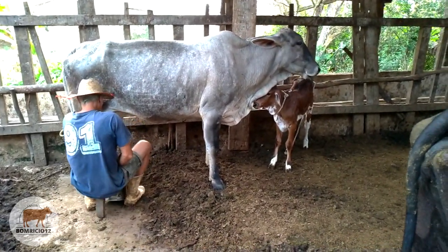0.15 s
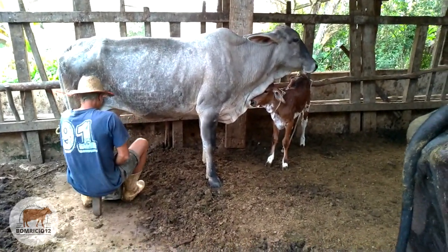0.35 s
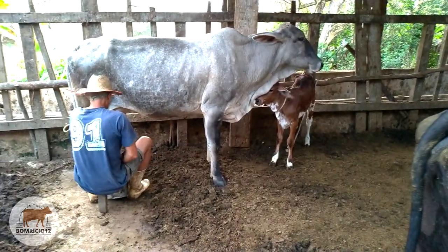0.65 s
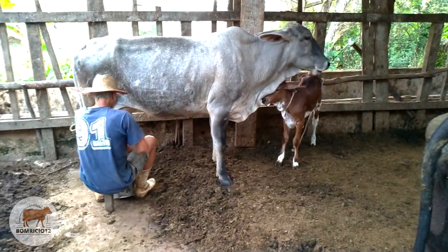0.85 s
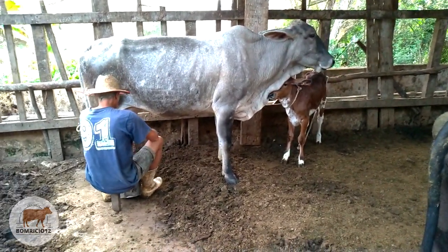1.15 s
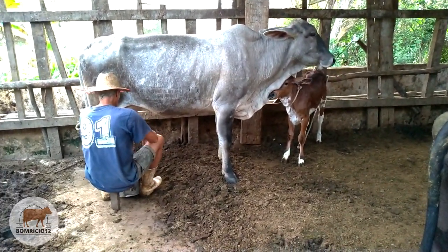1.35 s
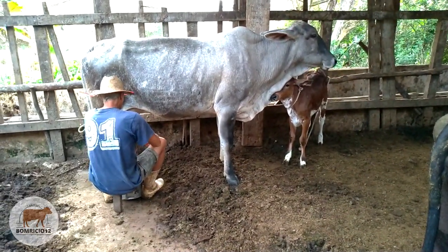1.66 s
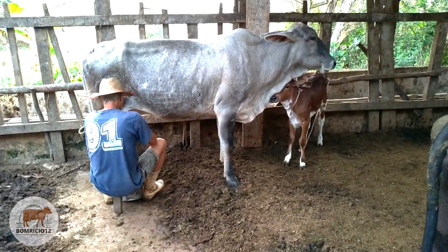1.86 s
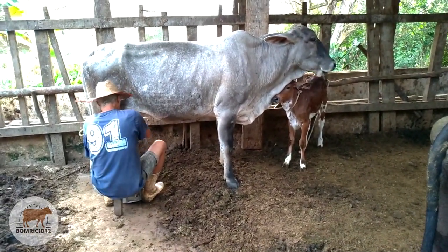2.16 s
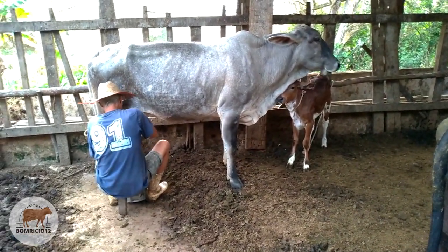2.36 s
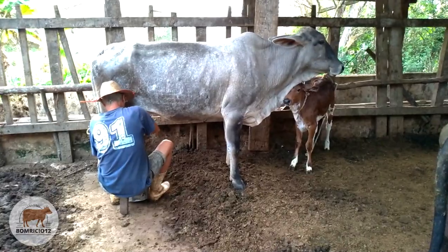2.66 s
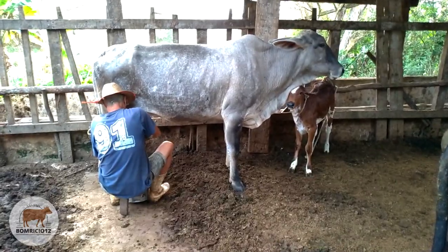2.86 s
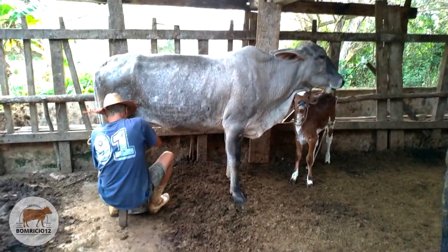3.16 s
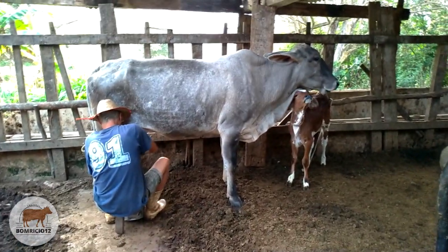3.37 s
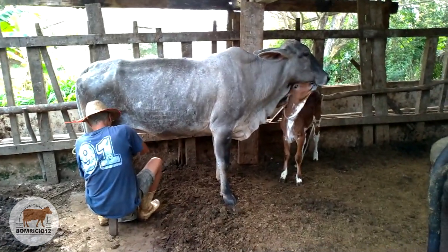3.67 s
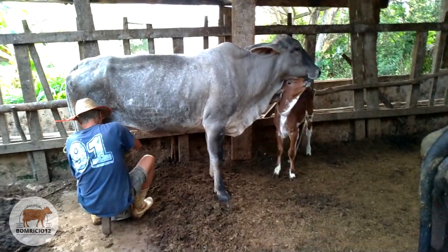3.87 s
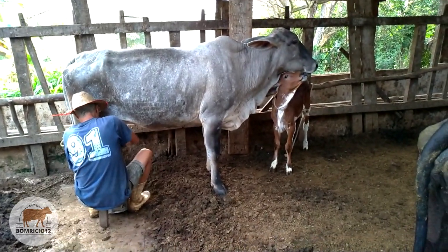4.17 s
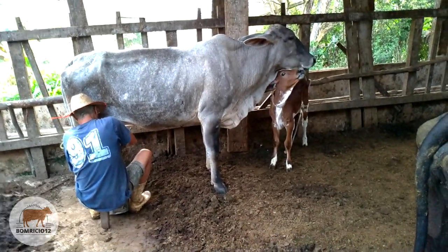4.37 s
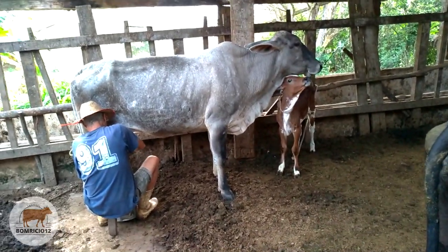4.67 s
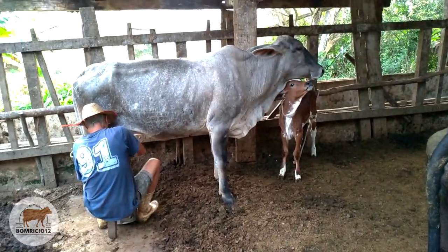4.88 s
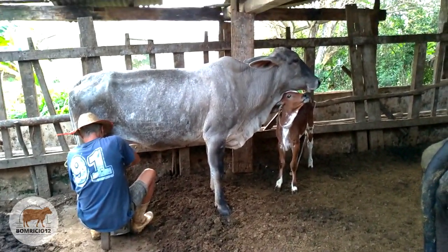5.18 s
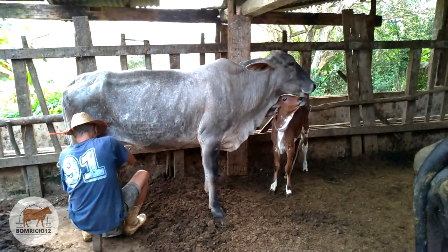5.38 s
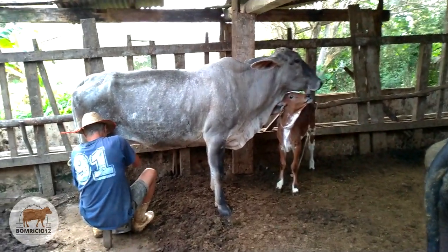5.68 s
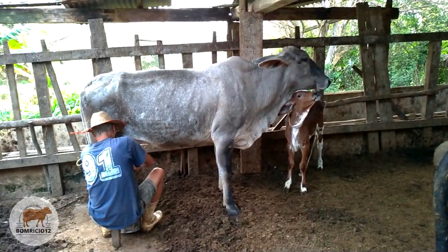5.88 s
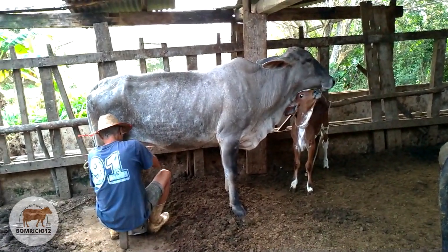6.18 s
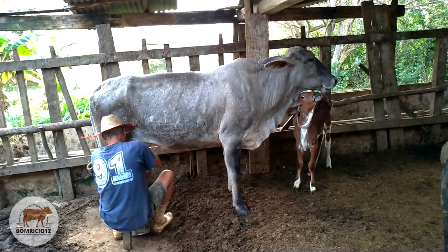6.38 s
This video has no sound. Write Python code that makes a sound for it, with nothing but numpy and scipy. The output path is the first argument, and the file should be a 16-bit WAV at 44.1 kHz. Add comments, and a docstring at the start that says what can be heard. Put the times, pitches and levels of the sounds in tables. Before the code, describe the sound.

Close by, a cow is milked by hand into a pail. After a few quick bumps and spurts, steady jets come about every 0.4 seconds, each hissing on froth, drumming the pail softly, then plunging with a wet bubbly slap. Chicks peep throughout and a hen clucks once late on. Faint insects and leaves lie behind, in an open shed heard in stereo.

```python
"""Under an open shed, a cow is milked by hand into a pail. Each jet of milk sprays on the froth and drums
the pail (droplet clicks, ringing walls), then plunges through with a wet slap and churns up bubbles.
Chicks peep near and far (gliding whistles), a small bird whistles thinly far off, and a hen clucks once.
Insects sizzle (a narrow band of noise), and far leaves and air hush behind it all (coloured noise)."""
import sys
import numpy as np
from scipy import signal
from scipy.io import wavfile

SR = 44100
rng = np.random.default_rng(int(sys.argv[2]) if len(sys.argv) > 2 else 0)


def transcribe(signal):
    """Save signal, clipped to [-1, 1], as a 16-bit WAV file at the path in sys.argv[1]."""
    frames = np.atleast_2d(signal).T
    limited = np.clip(frames, -1, 1)
    pcm = np.round(limited * 32767).astype(np.int16)
    wavfile.write(sys.argv[1], SR, pcm)


N = 287973   # length of the scene [samples]

# the jet breaking through the froth: (time [s], level [dB], loudest bubble pitch [Hz], time to fall 60 dB [s])
PLUNGE_ROWS = [(-.006, -39.5, 890, 0.017), (0.078, -49.5, 1370, 0.075), (0.327, -50, 1440, 0.16),
               (0.426, -36, 1250, 0.15), (.806, -54, 1360, 0.16), (0.852, -43.5, 870, 0.36),
               (1.312, -50, 1000, 0.37), (1.361, -45.5, 956, 0.19), (1.777, -37.5, 1640, 0.18),
               (1.817, -44, 990, 0.29), (2.36, -54, 910, 1), (2.431, -38.5, 1030, 0.27),
               (2.692, -61, 1050, 0.048), (2.83, -45.5, 940, 0.36), (2.888, -32, 1050, 0.061),
               (3.243, -49.5, 895, 0.85), (3.265, -38, 1280, 0.13), (3.294, -43.5, 840, 0.29),
               (3.655, -49.5, 825, 0.2), (3.678, -35.5, 933, 0.24), (4.029, -50, 840, 0.8),
               (4.077, -33.5, 1090, 0.17), (4.443, -56, 1210, .2), (4.472, -32.5, 943, 0.2),
               (4.835, -45, 880, 0.36), (4.87, -40.5, 1140, 0.14), (5.227, -25, 805, 0.011),
               (5.616, -53, 890, 0.48), (5.646, -42.5, 1010, 0.43), (5.677, -40.5, 1310, 0.26),
               (6.2, -55, 1000, 0.96), (6.255, -49, 1220, 0.38), (6.3, -43.5, 950, 0.16)]
# ringing modes of the pail's wall: (pitch [Hz], width [Hz], level [dB])
PAIL_MODES = [(153.4, 44, -9), (203, 61.5, 0.5), (274, 60, -1.5), (331.1, 27.6, 1.5), (422, 37, -4.5),
              (502, 94, -5.5)]


def from_db(db):
    """Turn decibels into gain."""
    return 10 ** (np.asarray(db) / 20)


def rms_one(x):
    """Scale a sound to an rms level of 1."""
    return x / np.sqrt(np.mean(x ** 2) + 1e-20)


def in_time(rows):
    """Draw straight lines between the rows of a curve: each column becomes one value per sample."""
    times, *columns = np.transpose(rows)
    return [np.interp(np.arange(N) / SR, times, column) for column in columns]


def at_hz(points, hz):
    """Read a spectrum at any pitch, on a log-frequency axis."""
    points = np.array(points)
    return np.interp(np.log(hz), np.log(points[:, 0]), points[:, 1])


def drift(rate_hz):
    """Random wandering with spread 1: noise smoothed twice at the given rate, made at every 40th sample."""
    r = np.exp(-80 * np.pi * rate_hz / SR)
    noise = rng.standard_normal(N // 40 + 2002)
    slow = signal.lfilter([1], [1, -2 * r, r * r], noise)[2000:]   # the smoother's start is dropped
    return np.interp(np.arange(N) / 40, np.arange(len(slow)), rms_one(slow))


def resonate(x, hz, width_hz):
    """Ring at one pitch, with gain 1 at the peak."""
    r = np.exp(-np.pi * width_hz / SR)
    feed = np.array([1, 0, -1]) * (1 - r * r) / 2
    return signal.lfilter(feed, [1, -2 * r * np.cos(2 * np.pi * hz / SR), r * r], x + 1e-18)


def grains(per_s, spread_db):
    """Make random clicks of uneven size and sign, with rms 1."""
    sizes = from_db(spread_db * np.minimum(rng.exponential(1, N), 5)) * rng.choice([-1, 1], N)
    return rms_one(sizes * (rng.random(N) < per_s / SR))


def colour(sources, spectrum, patchy_db, likeness):
    """Colour two pairs of sources in third-octave bands, each with its level, flicker and left-right likeness."""
    out, edges_hz = 0, 25 * 2 ** np.arange(0, 9.5, 1 / 3)
    for k, (low, high) in enumerate(zip(edges_hz, edges_hz[1:])):
        band = signal.butter(2, [low, high], "band", fs=SR, output="sos")
        mid, side = signal.sosfilt(band, sources[k % 2])   # neighbouring bands use different pairs
        hz = np.sqrt(low * high)
        alike = np.clip(at_hz(likeness, hz), 0, 1)
        gain = from_db(at_hz(spectrum, hz) + patchy_db * drift(7.6))
        # the side part has opposite signs left and right, so it makes the channels differ
        out = out + gain * (np.sqrt(1 + alike) * mid + np.sqrt(1 - alike) * side * [[1], [-1]])
    return rms_one(out)


def bursts(at_s, peak_db, rise_s, t60, size=1):
    """Power of one burst, one value per size samples: a quick rise, then a fall of 60 dB in t60 seconds."""
    t = np.arange(0, N, size) / SR - at_s
    rise_s, t60 = max(rise_s, .001), max(t60, .01)
    rise = np.clip(t / rise_s, 0, 1) ** 2
    fall = from_db(-120 * np.clip(t - rise_s, 0, None) / t60)
    return from_db(2 * peak_db) * rise * fall


def leaves_and_air():
    """Far leaves and air blend into a flickering hush: noise coloured band by band."""
    # hush: (pitch [Hz], level per Hz [dB])
    hush_colour = [(25, -39), (59, 4), (119, -8), (322, -5), (552, -10.5), (1420, -16), (2180, -15.5),
                   (3930, -22.5), (5400, -14.5), (7710, -35), (9560, -22.5), (13600, -39), (15500, -12)]
    # how alike left and right are: (pitch [Hz], likeness [0 to 1])
    hush_likeness = [(30, 0.28), (150, 0.89), (500, 0.42), (2000, 0.033), (15000, 0.029)]
    noise = rng.standard_normal((2, 2, N))
    return from_db(-60.5) * colour(noise, hush_colour, 4.36, hush_likeness)


def insects():
    """Many insects blur into a sizzle: noise in one steep band, its own in each channel, wavering in level."""
    band = signal.butter(6, (3920, 5050), "band", fs=SR, output="sos")
    sizzle = signal.sosfilt(band, rng.standard_normal((2, N)))
    return from_db(-64 + 2.7 * drift(4.4)) * rms_one(sizzle)


def shed(x):
    """Close echoes of rails and ground, then the roof's longer tail: decaying noise, its own in each channel."""
    tail_t60_s, close_t60_s = 0.4, .16
    t = np.arange(round(tail_t60_s * SR)) / SR
    decay = from_db(-60 * t / tail_t60_s) + from_db(5 - 60 * t / close_t60_s)
    tail = rng.standard_normal((2, len(t))) * decay * (t > .003)
    soft = signal.butter(2, 3600, fs=SR, output="sos")   # earth and straw swallow treble
    tail = signal.sosfilt(soft, tail)
    tail /= np.sqrt(np.sum(tail ** 2, axis=1, keepdims=True))
    return signal.fftconvolve(np.broadcast_to(x, (2, N)), tail, axes=1)[:, :N]


def flock():
    """Chicks further off peep at random: 45 rows with the same columns as the nearer peeps."""
    # (lowest, highest) of time, hold and fall [s], top and bottom pitch [Hz], level [dB]
    ranges = [(0, N / SR - .01), (.008, .045), (.02, .06), (3660, 4730), (2415, 3230), (-77, -58.5)]
    low, high = np.transpose(ranges)
    return list(low + (high - low) * rng.random((45, 6)))


def chicks(sag, waver, rasp):
    """A peep holds a whistle that sags a little, then drops; a small bird far off whistles the same way."""
    # chicks: (time [s], hold [s], fall [s], top pitch [Hz], bottom pitch [Hz], level [dB])
    peep_rows = [ (.0, 0.019, 0.03, 3880, 2530, -56), (0.132, 0.024, 0.0064, 4570, 4400, -56),
                 (0.174, 0.0096, 0.026, 4170, 2300, -49), (0.29, 0.016, 0.033, 3810, 2640, -51.5),
                 (0.446, 0.012, 0.026, 3970, 2460, -49.5), (0.573, 0.012, 0.029, 3910, 2570, -59),
                 (0.683, 0.035, 0.035, 3800, 2540, -64), (0.863, 0.029, 0.012, 4560, 4360, -54.5),
                 (0.88, 0.0086, 0.13, 4170, 3000, -55.5), (1.002, 0.0091, 0.039, 3860, 2410, -51.5),
                 (1.02, 0.022, 0.042, 4130, 3400, -51), (1.117, 0.017, 0.038, 3750, 2390, -54),
                 (1.161, 0.043, 0.04, 4600, 3660, -53), (1.291, 0.008, 0.037, 3460, 2290, -54),
                 (1.321, 0.011, 0.045, 3294, 2500, -56.5), (1.326, 0.047, 0.011, 4460, 4170, -53),
                 (1.492, 0.014, 0.037, 3870, 2780, -57), (1.542, 0.0087, 0.043, 2840, 2670, -60.5),
                 (1.566, 0.036, 0.037, 4010, 3100, -57.5), (1.663, 0.013, 0.026, 3700, 2660, -56),
                 (1.708, 0.012, 0.033, 3630, 2550, -71.5), (1.828, 0.018, 0.042, 4600, 3970, -52),
                 (1.875, 0.017, 0.03, 3890, 3450, -53), (1.889, 0.0053, 0.019, 3290, 2210, -48.5),
                 (2.018, 0.012, 0.024, 3860, 2310, -46.5), (2.021, 0.063, 0.022, 4470, 4220, -54),
                 (2.087, 0.0043, 0.016, 3440, 2490, -54), (2.208, 0.054, 0.04, 4410, 3850, -55),
                 (2.266, 0.0051, 0.021, 3750, 2390, -53), (2.337, 0.016, 0.03, 4050, 2940, -55.5),
                 (2.443, 0.026, 0.043, 4240, 2540, -55), (2.592, 0.0084, 0.049, 4120, 2720, -52),
                 (2.605, 0.046, 0.0099, 4370, 4200, -61.5), (2.626, 0.0041, 0.028, 3300, 2485, -53.5),
                 (2.753, 0.012, 0.027, 4060, 2710, -50.5), (2.819, 0.04, 0.015, 4425, 4000, -55),
                 (2.861, 0.0057, 0.022, 2980, 2490, -56), (2.938, 0.011, 0.027, 3890, 2390, -53.5),
                 (2.994, 0.04, 0.05, 4370, 3380, -53), (3.146, 0.029, 0.07, 4500, 3640, -55.5),
                 (3.35, 0.039, 0.023, 4410, 2490, -55), (3.43, 0.042, 0.015, 3880, 2940, -60),
                 (3.597, 0.032, 0.024, 3880, 2430, -54.5), (3.654, 0.025, 0.022, 3910, 2480, -52),
                 (3.752, 0.024, 0.0095, 4170, 4100, -52), (3.779, .006, 0.059, 3410, 2370, -58),
                 (3.788, 0.039, .01, 3850, 3750, -53), (3.841, 0.033, 0.026, 4510, 4220, -51.5),
                 (3.859, 0.0094, 0.013, 3200, 2770, -51.5), (3.906, 0.092, 0.025, 3830, 3700, -56),
                 (3.984, 0.0141, 0.11, 4550, 3820, -54), (4.168, 0.026, 0.022, 4580, 2450, -51.5),
                 (4.244, 0.045, 0.032, 4194, 2280, -56.5), (4.369, 0.028, 0.028, 3834, 2470, -53),
                 (4.507, 0.03, 0.025, 3940, 3310, -58), (4.705, 0.057, 0.11, 4690, 3255, -54.5),
                 (4.916, 0.013, 0.062, 4620, 4130, -51), (4.989, 0.0068, 0.025, 3400, 2370, -54),
                 (5.001, 0.054, 0.018, 4550, 4550, -53.5), (5.0, 0.1, 0.031, 4030, 3530, -49.5),
                 (5.048, 0.0059, 0.027, 3750, 2590, -52.5), (5.101, 0.014, 0.048, 3800, 2510, -55),
                 (5.133, 0.031, 0.037, 3980, 2660, -50), (5.248, 0.043, 0.042, 4590, 3800, -53),
                 (5.301, .015, 0.043, 3570, 2530, -56), (5.448, 0.039, 0.043, 4640, 4056, -52),
                 (5.461, 0.039, 0.042, 4020, 2510, -53.5), (5.684, .008, 0.039, 3310, 2620, -51),
                 (5.734, .02, 0.018, 2890, 2600, -68), (5.704, 0.068, 0.028, 3950, 3850, -57.5),
                 (5.867, 0.011, 0.028, 3530, 2320, -55), (5.933, 0.05, 0.03, 4080, 2660, -53.5),
                 (5.935, 0.055, 0.066, 4720, 3900, -53), (6.079, 0.0069, 0.033, 3475, 2690, -56.5),
                 (6.123, 0.027, 0.03, 3950, 2510, -53), (6.231, 0.045, 0.077, 4520, 2925, -54)]
    # small bird: (time [s], hold [s], glide [s], first pitch [Hz], last pitch [Hz], level [dB])
    bird_rows = [(1.089, 0.05, 0.095, 9950, 10900, -75), (1.47, .04, 0.071, 9300, 7000, -75)]
    # throat: (pitch [Hz], level [dB])
    throat = [(2300, -5), (2900, 1), (3400, -2.5), (4700, 0)]
    attack_s, release_s, overtone_db = 0.0085, 0.0022, -18
    wall_echo_s, wall_echo_db, left_lead = .046, -13.5, 3   # the lead is in samples
    out, shake, hoarse = np.zeros(N), drift(48.7), 1 + rasp * drift(310)
    for s, hold, fall, top_hz, bottom_hz, db in peep_rows + bird_rows + flock():
        hold, fall, at = max(hold, .003), max(fall, .006), round(max(s, 0) * SR)
        t = np.arange(min(round((hold + fall) * SR), N - at)) / SR
        hz = np.interp(t, [0, hold, hold + fall], [top_hz, top_hz * sag, bottom_hz])
        phase = 2 * np.pi * np.cumsum(hz * (1 + waver * shake[at:at + len(t)])) / SR
        edges = np.clip(np.minimum(t / attack_s, (hold + fall - t) / release_s), 0, 1)
        whistle = np.sin(phase) + from_db(overtone_db) * np.sin(2 * phase)
        out[at:at + len(t)] += np.sqrt(2) * from_db(db + at_hz(throat, hz)) * edges * whistle
    out *= hoarse
    delay = round(wall_echo_s * SR)
    out[delay:] += from_db(wall_echo_db) * out[:-delay]   # one distinct echo from a far wall
    return np.array([out, np.roll(out, left_lead)])


def hen(rough):
    """A short cluck breaks to a lower pitch: seven harmonics, shaped by the throat, with a shaky pitch."""
    # cluck: (time [s], pitch [Hz], level [dB])
    cluck_rows = [(5.194, 616.3, -49), (5.208, 639, -40.5), (5.218, 669, -36), (5.224, 437.7, -38),
                  (5.25, 440, -44), (5.275, 387.3, -46), (5.32, 402.5, -52.5)]
    # throat: (pitch [Hz], level [dB])
    throat = [(400, -2.5), (650, 6), (900, 11), (1350, 3.5), (1800, -20), (2250, -9.5), (3000, -17)]
    hz, db = in_time(cluck_rows)
    t = np.arange(N) / SR
    phase = 2 * np.pi * np.cumsum(hz * (1 + rough * drift(83.7))) / SR
    voice = sum(from_db(at_hz(throat, k * hz)) * np.sin(k * phase) for k in range(1, 8))
    sounding = (t > cluck_rows[0][0]) & (t < cluck_rows[-1][0])
    return voice * from_db(db) * sounding


def bumps(narrow_db, damped_t60):
    """A soft bump rings wall modes near its favoured pitch until a leg or hand damps them; a brief tap opens it."""
    # bumps against the pail: (time [s], level [dB], favoured pitch [Hz], rings free for [s])
    bump_rows = [(.0, -28.5, 243, 0.037), (.14, -19.5, 208, 0.025), (0.179, -28, 300, 0.015),
                 (0.238, -41, 239, 0.043), (3.49, -38, 324, 0.025), (4.575, -37.5, 330, 0.056)]
    out, t = np.zeros(N), np.arange(SR // 4) / SR
    for s, peak_db, favoured_hz, free_s in bump_rows:
        at = round(s * SR)
        gains = [from_db(db - narrow_db * abs(np.log2(hz / favoured_hz))) for hz, width_hz, db in PAIL_MODES]
        rings = sum(g * np.sin(2 * np.pi * mode[0] * t) for g, mode in zip(gains, PAIL_MODES)) / sum(gains)
        tap = from_db(-14 - 60 * t / .03) * np.sin(2 * np.pi * 640 * t)
        damping = from_db(peak_db - 60 * np.clip(t - free_s, 0, None) / damped_t60)
        out[at:at + len(t)] += damping * np.clip(t / 0.0017, 0, 1) * (rings + tap)
    return out


def jets():
    """Each jet lands, changes while the hand squeezes, then fades: power of its drumming and of its spray."""
    # jets of milk: (landing time [s], onset lasts [s], squeeze lasts [s], drumming level at squeeze end [dB],
    # drumming swell up to there [dB], drumming fade [dB per s], spray level at landing [dB])
    jet_rows = [(0.0, 0.0034, 0.0098, -40.5, -11, 54, -36.5), (0.202, 0.0062, 0.0045, -43.5, -2, 189, -51),
                (0.327, .005, 0.14, -41.5, 12.5, 115, -51.5), (0.731, .008, 0.039, -47.5, 14, 252, -57),
                (0.781, .012, 0.16, -44.5, 10.5, 67, -53.5), (1.248, 0.031, 0.15, -39, 14, 104, -48.5),
                (1.718, 0.0059, 0.086, -43, 18, 64, -55.5), (2.325, 0.02, 0.14, -36.5, 16, 102, -56.5),
                (2.787, 0.0046, 0.13, -39.5, 12.5, 91, -50), (3.209, 0.006, 0.18, -43.5, 5.5, 109, -52),
                (3.624, 0.0046, 0.072, -41, 11, 60, -50.5), (4.014, 0.0082, 0.13, -39, 8.5, 125, -47.5),
                (4.404, 0.02, 0.2, -46.5, 1, 189, -48.5), (4.807, 0.014, 0.082, -42, 12.5, 67, -50.5),
                (5.169, 0.015, 0.18, -42.5, 12.5, 97, -54), (5.585, 0.031, 0.16, -44, 4.5, 133, -46.5),
                (5.988, 0.014, 0.38, -44, 18.5, 87, -59.5)]
    # a jet that lands hard has spent its spray early; shares are of the drumming's swell and fade
    swell_share, sag_db, fade_share = 0.79, 8, 0.9
    drumming, spraying = 1e-12, 1e-12
    for s, onset_s, squeeze_s, drum_db, swell_db, fade_db, spray_db in jet_rows:
        t = np.arange(N) / SR - s
        landed = np.clip(t / max(onset_s, .002), 0, 1) ** 2
        squeezed = np.clip(t / max(squeeze_s, .003), 0, 1)
        since = np.clip(t - squeeze_s, 0, None)
        drum_now_db = drum_db - swell_db * (1 - squeezed) - fade_db * since
        drumming = drumming + landed * from_db(2 * drum_now_db)
        spray_gain_db = (swell_share * swell_db - sag_db) * squeezed - fade_share * fade_db * since
        spraying = spraying + landed * from_db(2 * (spray_db + spray_gain_db))
    return drumming, spraying


def pail():
    """Splashes ring the wall modes; the jet wanders, so it favours now one mode, now another."""
    # where the jets land: (time [s], upper modes against lower ones [dB per octave])
    aim = [(0, -3.5), (2, -5), (2.6, -2.5), (3.4, 0.5), (4.5, -2), (5.6, -2), (6.53, -3)]
    tilt_db, = in_time(aim)
    drummed, splashes = 0, grains(400, spread_db=2.5)
    for k, (hz, width_hz, db) in enumerate(PAIL_MODES):
        ring = rms_one(resonate(splashes * from_db(2.5 * drift(3.1)), hz, width_hz))
        tilt = from_db(tilt_db * np.log2(hz / 260))
        drummed = drummed + (-1) ** k * from_db(db) * ring * tilt
    soft = signal.butter(2, 520, fs=SR, output="sos")   # wet contacts carry little treble
    drumming = signal.sosfilt(soft, np.sqrt(jets()[0]) * rms_one(drummed))
    return drumming + bumps(narrow_db=13.5, damped_t60=0.058)


def spray():
    """Dense droplets crackle on the froth: coloured clicks that follow the uneven jet."""
    # spray: (pitch [Hz], level per Hz [dB])
    spray_colour = [(300, -4.5), (1000, -5), (2500, -6), (5000, -6), (7000, -16), (10000, -14),
                    (14000, -28), (16000, -8)]
    spurt_db, spurt_hz = 1, 16   # size and rate of the jet's unevenness
    drops = np.array([[grains(2500, spread_db=0.5) for side in "lr"] for pair in "ab"])
    power = jets()[1] * from_db(2 * spurt_db * drift(spurt_hz))
    return np.sqrt(power) * colour(drops, spray_colour, 2.94, [(300, 1.0), (15000, 0.02)])


def spatters():
    """Droplets land in a sudden short cluster: clicks through a resonance, each spatter with its own colour."""
    # spatters: (time [s], level [dB], brightest pitch [Hz])
    spatter_rows = [(.0956, -56, 6000), (.8594, -54, 7000), (2.4354, -56, 9000), (2.896, -64, 6500),
                    (3.682, -44, 6200), (4.52, -49.5, 9200), (5.212, -54, 7000), (5.511, -58, 6200)]
    drops, out = np.array([grains(1400, spread_db=2.0) for side in "lr"]), 0
    for s, db, hz in spatter_rows:
        envelope = np.sqrt(bursts(s, db, rise_s=0.008, t60=0.06))
        out = out + envelope * rms_one(resonate(drops, hz, hz * 0.21))
    return out * from_db([[2], [-2]])   # a little to the left


PLUNGE_RISE_S = 0.012


def slaps():
    """The jet punches through the surface with a short, rough, wet slap: clicks kept to a middle band."""
    power = sum(bursts(s, db - 6, PLUNGE_RISE_S, 0.032, size=20) for s, db, centre_hz, t60 in PLUNGE_ROWS)
    band = signal.butter(2, (1160, 1750), "band", fs=SR, output="sos")
    rough = signal.sosfilt(band, grains(600, spread_db=6.0))
    return np.sqrt(np.repeat(power, 20)[:N]) * rms_one(rough)


def pops():
    """A single big bubble bursts: it rings a few cycles, rising in pitch as it dies away."""
    # pops: (time [s], level [dB], starting pitch [Hz])
    pop_rows = [(0.438, -21.5, 1400), (0.866, -38, 770), (1.788, -36, 1490), (2.441, -26, 1190),
                (2.843, -29, 960), (2.9, -35, 1080), (3.685, -26, 890), (4.094, -17, 1235),
                (4.485, -20, 960)]
    fade_cycles, rise = 16.0, .12   # cycles to fall 60 dB; strength of the upward glide
    out = np.zeros(N)
    for s, peak_db, hz in pop_rows:
        cycles, at = hz * np.arange(SR // 20) / SR, round(s * SR)
        spent = cycles / fade_cycles
        ring = np.sin(2 * np.pi * cycles * (1 + rise * spent))
        out[at:at + len(cycles)] += from_db(peak_db - 60 * spent) * np.clip(cycles, 0, 1) * ring
    return out


def bubbles(per_s, cycles, low_octaves, high_octaves, core_db, tail_db, tail_t60):
    """Each plunge frees a cloud of bubbles around one pitch; smaller numbers keep rising after it."""
    pitches = np.geomspace(560, 3400, 26)
    power = np.zeros((len(pitches), N // 20 + 2))   # one value per 20 samples
    for s, db, centre_hz, t60 in PLUNGE_ROWS:
        octaves = np.log2(pitches / centre_hz)
        share = from_db(-12 * (octaves / np.where(octaves < 0, low_octaves, high_octaves)) ** 2)
        # the air pocket under the jet rings at one pitch
        share += from_db(2 * core_db - 9.8 * (octaves / 0.13) ** 2)
        cloud = bursts(s, db, PLUNGE_RISE_S, t60, size=20)
        cloud = cloud + bursts(s, db + tail_db, PLUNGE_RISE_S, tail_t60, size=20)
        power[:, :len(cloud)] += np.outer(share / share.sum(), cloud)
    out = 0
    for hz, pitch_power in zip(pitches, power):
        births = grains(per_s, spread_db=3.5) * np.sqrt(np.repeat(pitch_power, 20)[:N])
        unit_gain = np.sqrt(SR * cycles / (np.pi / 2 * hz))   # white in, unit power out
        out = out + resonate(births, hz, hz / cycles) * unit_gain
    return signal.sosfilt(signal.butter(2, 560, "high", fs=SR, output="sos"), out)


def scene():
    """The pail stands a little to the right; chicks and yard surround it."""
    yard = leaves_and_air() * from_db([[-.4], [.4]])
    peeps = chicks(sag=.98, waver=.012, rasp=.4)
    churn = bubbles(per_s=120, cycles=23.0, low_octaves=0.88, high_octaves=1.05,
                    core_db=6.5, tail_db=-13, tail_t60=0.36)
    milk_and_hen = churn + slaps() + pops() + hen(rough=0.0253)
    near = milk_and_hen * from_db([[-2.8], [1.6]]) + pail() * from_db([[-.3], [.3]])
    near = near + spray() * from_db([[.4], [-.4]]) + spatters()
    near[0] = np.roll(near[0], -6)   # left leads by 6 samples
    echoes = shed(from_db(-9.5) * milk_and_hen + from_db(-2) * peeps) * from_db([[-1.2], [.6]])
    return near + peeps * from_db([[-1.3], [-.3]]) + echoes + yard + insects()


def record(dry):
    """The microphone drops the deepest bass; the top is cut steeply."""
    thinned = signal.sosfilt(signal.butter(4, 44, "high", fs=SR, output="sos"), dry)
    top_cut = signal.cheby2(14, 70, 15800, fs=SR, output="sos")   # 70 dB down from 15800 Hz up
    return signal.sosfilt(top_cut, thinned)


dry = scene()
out = record(dry)
transcribe(out)
```